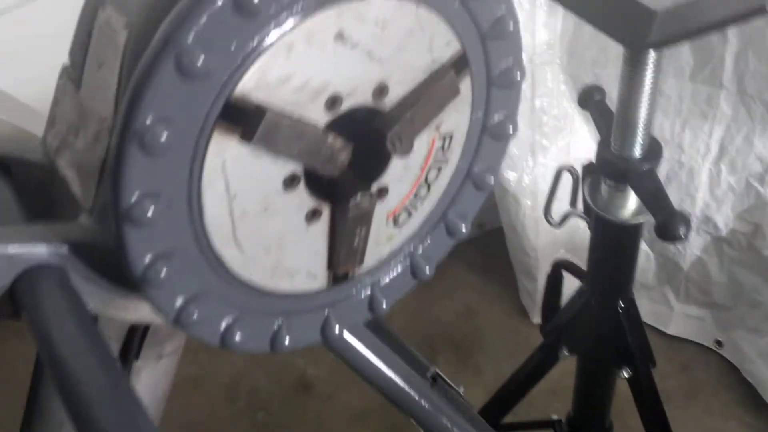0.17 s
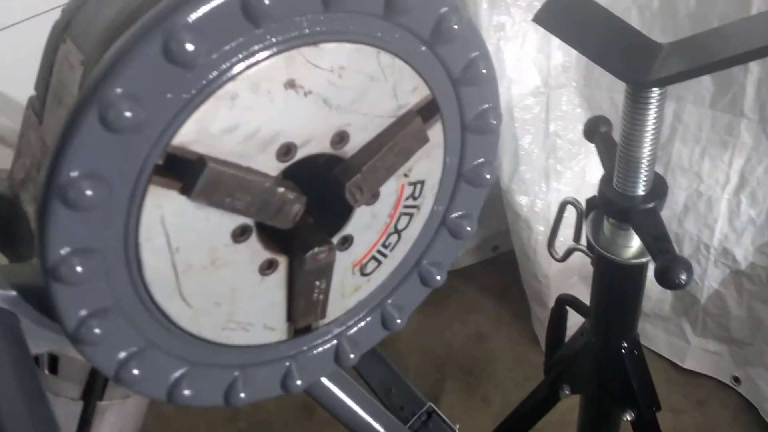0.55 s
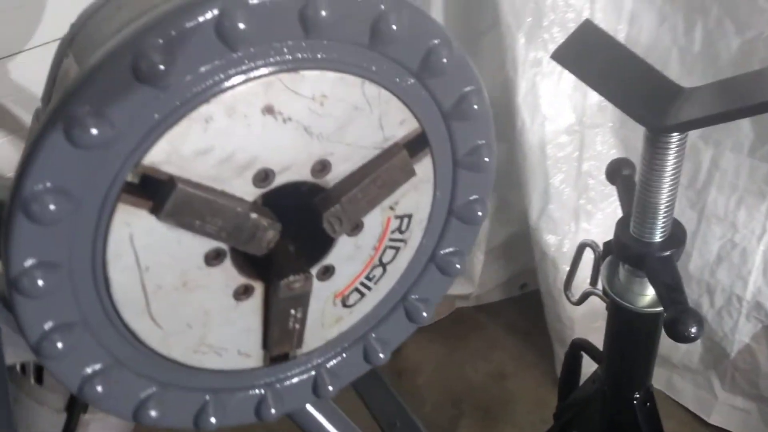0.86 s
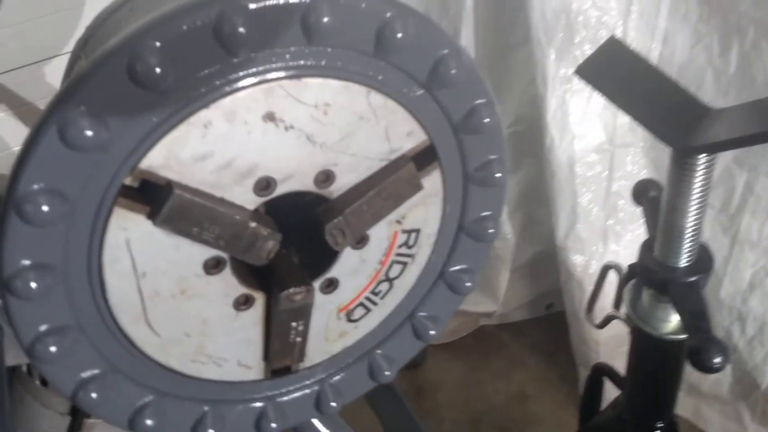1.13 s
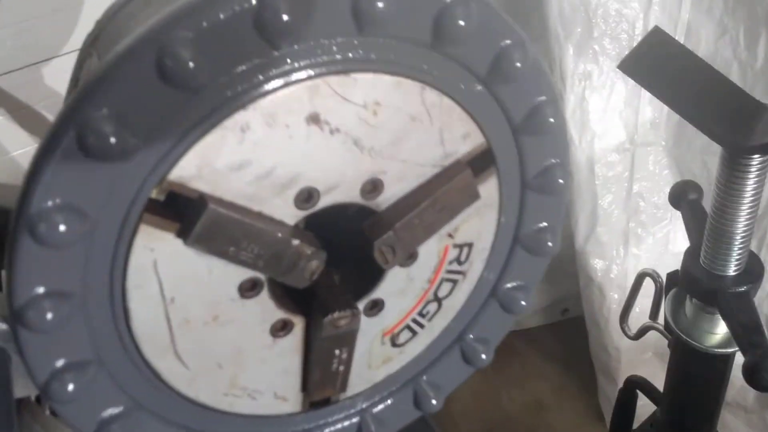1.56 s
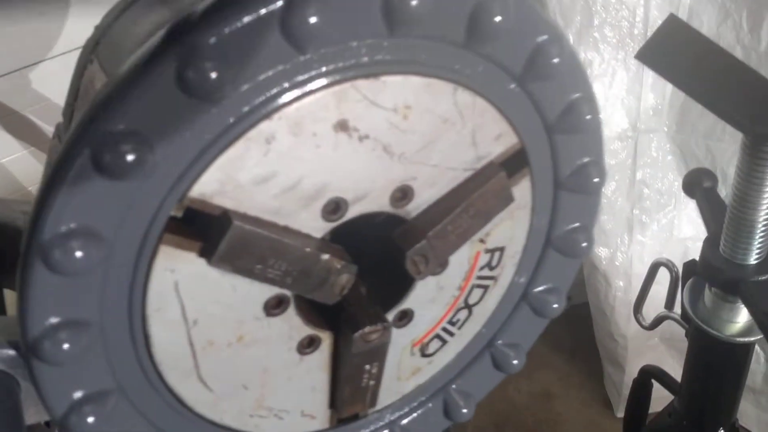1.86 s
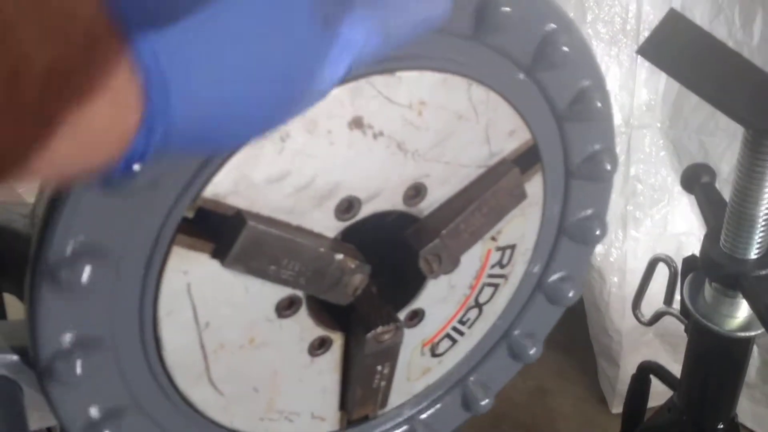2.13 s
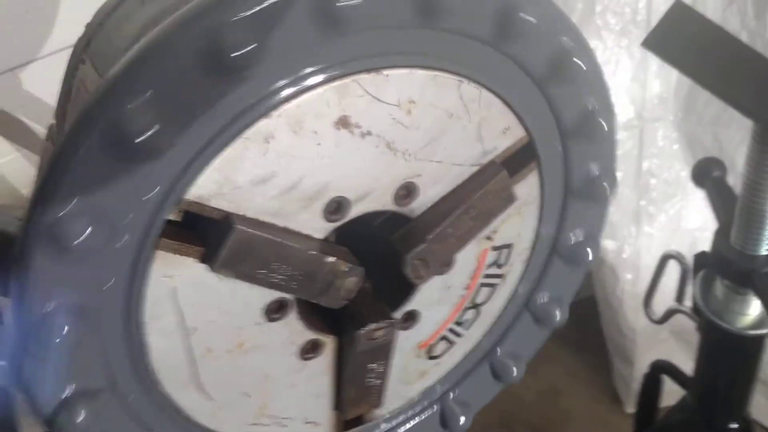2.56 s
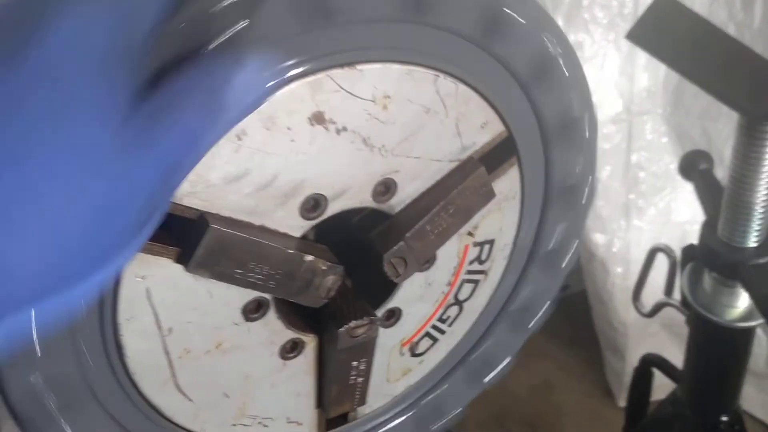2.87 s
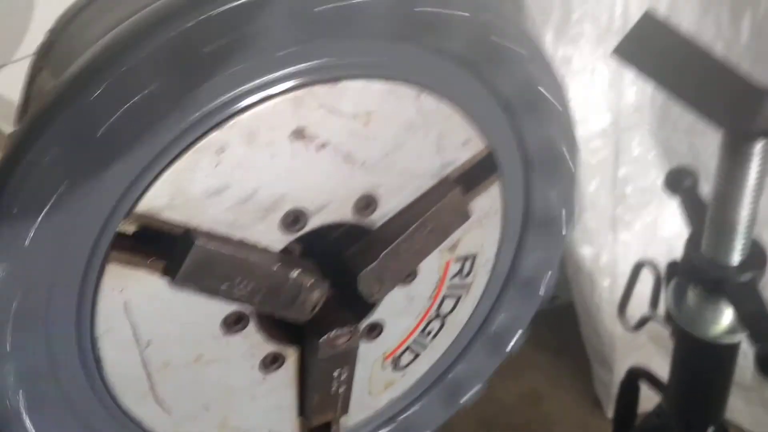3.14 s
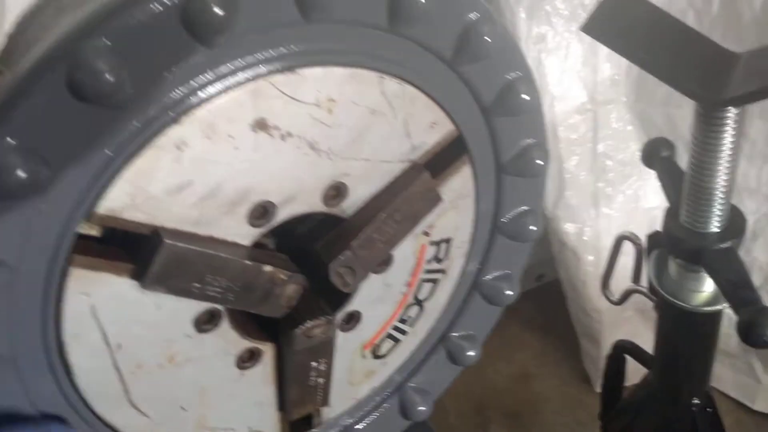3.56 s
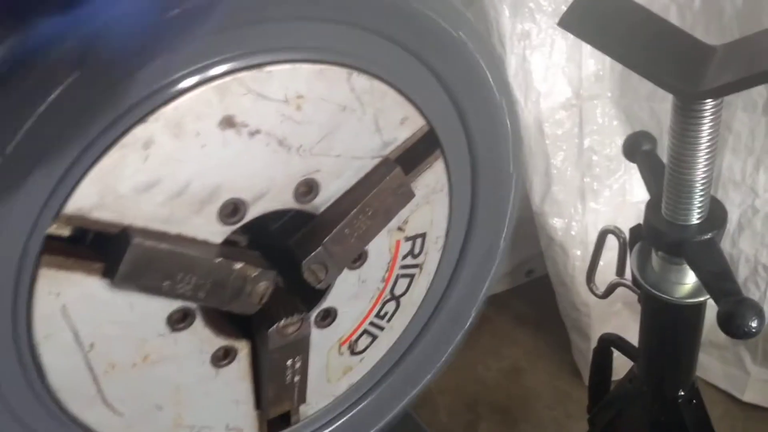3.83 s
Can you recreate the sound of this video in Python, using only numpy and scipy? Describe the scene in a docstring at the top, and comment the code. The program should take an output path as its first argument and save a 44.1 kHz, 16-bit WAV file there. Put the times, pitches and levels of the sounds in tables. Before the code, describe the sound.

A hard metallic clank of a heavy cast wheel strikes at 3.7 s, bright and cracking, with rapid rebounds, clatter and a short inharmonic ring until the end. Before it, low ventilation rumble, faint rubs and dull knocks near 0.5 and 1.1 s, then firmer hollow knocks and gritty glove rubbing at 2.0, 2.3, 2.7-3.0 and 3.5 s. Indoors, close wide stereo microphone.

```python
"""First a low room rumble and soft rubbing: a gloved hand spins the heavy cast wheel of a pipe threader's chuck.
The wheel knocks softly when grabbed, then hammers home with a ringing clank and quick rebounds.
Rumble, rubbing and clatter are shaped noise; wheel, housing and frame are ringing sines set off by clicks and noise.
Two close microphone ports are widened by feeding each, late and inverted, into the other side."""
import sys
import numpy as np
from scipy import signal
from scipy.fft import rfft, irfft
from scipy.io import wavfile

SR = 44100
rng = np.random.default_rng(int(sys.argv[2]) if len(sys.argv) > 2 else 0)


def put_to_file(sound):
    """Save the sound as 16-bit audio at rate SR, in the file named by the first command-line argument."""
    columns = np.atleast_2d(sound).T  # one column per channel
    safe = np.clip(columns, -1, 1)
    whole_steps = np.round(safe * 32767)
    wavfile.write(sys.argv[1], SR, whole_steps.astype(np.int16))


N = 176400  # samples, 4 s

# Sounds have two rows: middle (alike in both ports) and side (opposite in the two ports).
# A t60 is the time in seconds for a sound to die away by 60 dB.


def amp(db):
    """Turn dB into a gain."""
    return 10 ** (np.asarray(db, float) / 20)


def coloured(spectrum, source):
    """Filter middle and side by a spectrum each, then scale their summed power to 1."""
    hz, *levels = np.transpose(spectrum)
    log_hz = np.log(np.maximum(np.arange(N // 2 + 1) * SR / N, 1))
    gains = [amp(np.interp(log_hz, np.log(hz), db)) for db in levels]
    out = irfft(rfft(source) * gains, N)
    return out / np.sqrt(np.mean(out ** 2) * 2)


def noise():
    """Two unrelated white noises."""
    return rng.standard_normal((2, N))


def drift(rate):
    """Slow random wandering with a spread near 1: straight lines between random points, rate per second."""
    knots = rng.standard_normal(int(rate * N / SR) + 2)
    return np.interp(np.arange(N) * rate / SR, np.arange(len(knots)), knots) * np.sqrt(1.5)


def ring(force, hz, t60):
    """A two-pole resonator: a unit click sets a dying sine of starting height 1 ringing."""
    r, w = amp(-60 / (t60 * SR)), 2 * np.pi * hz / SR
    # the tiny offset keeps the silence from slowing the filter
    return signal.lfilter([0, np.sin(w)], [1, -2 * r * np.cos(w), r * r], force + 1e-18)


def dying(times, db, t60, attack_s):
    """Loudness curve of hits: a short rise over an exponential fall."""
    t = np.maximum(np.arange(N) / SR - np.c_[times], 0)
    fall = amp(np.c_[db] - 60 * t / np.c_[t60])
    return (fall * np.minimum(t / attack_s, 1)).sum(axis=0)


def clicks(times, gains):
    """One-sample clicks at the given times."""
    out = np.zeros(N)
    out[(np.array(times) * SR).astype(int)] = gains
    return out


# Tone colour of the room rumble.
# Each row: frequency in Hz, middle level in dB, side level in dB (relative).
ROOM_COLOUR = [(45, -94, -105), (74, -93, -101), (128, -87, -100), (222, -91, -101), (337, -91, -99),
               (653, -94.5, -97.5), (1300, -99, -101.5), (1940, -99, -93.5), (2590, -105, -106),
               (3590, -115, -114), (5830, -122, -121), (8500, -125, -125), (9200, -129, -128),
               (13800, -135, -134)]
# How the room swells. Each row: time in seconds, gain in dB.
ROOM_LOUDNESS = [(0, 2), (.6, 1.5), (1.2, 1), (2.2, 1.5), (3.2, 0), (4, 6.5)]
# Notes of the room. Each row: frequency in Hz, width in Hz, level in dB before the swell.
ROOM_NOTES = [(139.7, 5.2, -69), (359.4, 3.9, -70.5), (269.8, 12, -73), (543, 24, -73), (735.6, 9.9, -73.5),
              (902, 37, -77.5), (1189, 39, -78.5)]
ROOM_DB, ROOM_FLICKER_DB = -60, .6


def room_tone():
    """Distant ventilation rumble: flickering shaped noise, plus noise ringing a few room resonances."""
    out = amp(ROOM_DB + ROOM_FLICKER_DB * drift(14)) * coloured(ROOM_COLOUR, noise())
    for hz, width_hz, db in ROOM_NOTES:
        t60 = np.log(1000) / np.pi / width_hz  # a narrow resonance rings longer
        hum = ring(rng.standard_normal(N), hz, t60)
        out[0] += amp(db) * hum / hum.std()
    return out * amp(np.interp(np.arange(N) / SR, *np.transpose(ROOM_LOUDNESS)))


# Tone colours of the low grind and of the bright hiss; knocks and clank use the hiss too.
# Each row: frequency in Hz, middle level in dB, side level in dB (relative).
GRIND_COLOUR = [(100, -74, -79.5), (306, -72.5, -83), (606, -73, -77.5), (1010, -80, -90),
                (1780, -80.5, -75), (2730, -87, -87), (4100, -107, -108), (6000, -110, -109),
                (8000, -109, -110), (9900, -113, -113), (12500, -121, -121)]
HISS_COLOUR = [(2500, -6, -5), (4700, -0.5, -1.5), (6450, -5.5, -4), (8600, 1.5, -4), (9300, -10, -10),
               (12100, -9, -9), (14700, -19, -19)]
# Rubbing and rustling strokes.
# Each row: start in seconds, length in seconds, grind level in dB, hiss level in dB.
RUB_STROKES = [(0.187, 0.23, -91, -77.5), (0.478, 0.046, -53.5, -70.5), (0.97, .04, -68, -78.5),
               (1.115, 0.057, -61, -68.5), (1.977, 0.016, -51, -84), (2.329, 0.036, -47.5, -60),
               (2.37, 0.035, -51.5, -75), (2.73, 0.059, -50.5, -69.5), (2.876, 0.08, -53, -74.5),
               (2.913, 0.065, -64.5, -73.5), (2.961, 0.02, -52.5, -60.5), (2.981, 0.041, -52.5, -72),
               (3.538, 0.037, -48.5, -87), (3.576, 0.012, -61, -89)]
RUB_ATTACK_S, RUB_RELEASE_S = 0.0084, 0.013
HISS_SWELL_S = 0.033  # the hiss swells and fades more gently than the grind
GRAINS_PER_S, GRAIN_SPREAD_DB = 5000, 3


def rubs():
    """Glove and rim rub: dense uneven grains make the low grind, smooth noise the bright hiss."""
    s, length, grind_db, hiss_db = np.transpose(RUB_STROKES)[:, :, None]
    t = np.arange(N) / SR - s
    left = length - t
    stroke = np.clip(np.minimum(t / RUB_ATTACK_S, 1 + left / RUB_RELEASE_S), 0, 1)
    ramp = np.minimum(.5 + t / HISS_SWELL_S, .5 + left / HISS_SWELL_S)
    swell = np.sin(np.pi / 2 * np.clip(ramp, 0, 1)) ** 2
    grain_db = GRAIN_SPREAD_DB * np.minimum(rng.exponential(1, N), 4)
    grains = (rng.random(N) < GRAINS_PER_S / SR) * amp(grain_db)
    grind = (stroke * amp(grind_db)).sum(axis=0) * coloured(GRIND_COLOUR, grains * noise())
    hiss = (swell * amp(hiss_db)).sum(axis=0) * coloured(HISS_COLOUR, noise())
    return grind + hiss


# Pitches of the cast wheel's modes (its ways of ringing). Each entry: frequency in Hz.
MODE_HZ = [620, 872, 1450, 1590, 1647, 1700, 1771, 1860, 1960, 2401, 2541, 2643, 3315, 3833, 3994, 4228,
           4737, 5424, 5523, 5660, 6955, 7065, 7364, 7580, 7860, 8000, 8376, 8710, 9700, 10015, 10370,
           10541, 10990, 11348, 13280, 13400, 14000]
# Strength of those modes, in the same order.
# Each row: middle level in dB (relative), side level in dB (relative), t60 in seconds when free,
# extra dB when a rebound strikes elsewhere.
MODE_STRENGTHS = [(-21.5, -28, 0.7, -9), (-17.5, -20, 0.27, 10), (-28, -22, 0.4, 0), (-17, -3.5, 0.31, -2),
                  (-7.5, -10, 0.27, 5.5), (-13, -20, 0.36, 11), (-12.5, -3, 0.41, 7.5),
                  (-8.5, -24, 0.17, 2), (-19, -12, 0.31, 8), (-12, -12, 0.28, 22), (-7.5, -13, 0.31, -10),
                  (-18.5, -27, 0.39, -19), (-14, -16, 0.31, -1.5), (-19, -17, 0.2, 8),
                  (-21.5, -17.5, 0.33, 16), (-0.5, -24, 0.11, -20), (-22.5, -35, 0.25, 8),
                  (-12.5, -21, 0.11, 3), (-21.5, -21, 0.35, 11), (-43, -21, 0.23, 18), (-21.5, -32, .27, 7),
                  (-30, -27, 0.18, 6), (-25, -26, 0.34, -2), (-20, -17, 0.29, 0), (-22.5, -23, 0.3, 2),
                  (-26, -18, 0.3, 12), (-20.5, -31, 0.27, 6), (-19, -31, 0.33, 0), (-34, -32, 0.17, -3),
                  (-30, -18, 0.14, -5), (-16.5, -37.5, 0.15, -18), (-22, -27, .25, -4),
                  (-13.5, -30, 0.11, -23), (-25, -18, 0.12, -14), (-29, -29, 0.14, -13),
                  (-46, -40, 0.18, -2), (-43, -42, .2, 0)]


def wheel_modes():
    """Pair each pitch of the casting with its strengths and ring time."""
    return zip(MODE_HZ, MODE_STRENGTHS)


# Tone colour of the thud. Each row: frequency in Hz, middle level in dB, side level in dB (relative).
THUD_COLOUR = [(100, -85, -101), (326, -65, -74), (610, -64, -79), (1110, -80, -84), (1900, -71, -67.5),
               (2400, -79, -78), (3930, -95, -92), (7100, -109, -107), (10100, -124, -120),
               (13000, -131, -134)]
# Modes of the hollow housing. Each row: frequency in Hz, level in dB (relative), t60 in seconds.
HOUSING_MODES = [(345, -35, .06), (563, -3, 0.093), (573, -6.5, 0.14), (894, -17, 0.11), (1190, -8, 0.013)]
# Soft knocks on the wheel. Each row: start in seconds, thud level in dB, thud t60 in seconds, then
# relative levels in dB of the hollow ring, the rim ring, the tick and the pop.
SOFT_KNOCKS = [(0.486, -41.5, 0.02, -62, -55, -77, -47), (1.104, -44, 0.019, -75, -68, -54, -75),
               (1.972, -35.5, 0.032, -57.5, -50, -70, -48), (2.313, -34.5, 0.036, -50, -45, -61, -55),
               (2.319, -35, 0.061, -42, -50, -53, -52), (2.624, -60, 0.033, -66, -62, -74, -53),
               (2.728, -36.5, 0.095, -28, -51, -62, -44), (2.773, -56, .04, -55, -64, -75, -63),
               (2.823, -56, 0.049, -48, -52.5, -70, -54), (2.843, -48, 0.035, -47, -56, -66, -56),
               (2.894, -48, 0.044, -55, -47, -77, -64), (3.518, -32, 0.061, -47, -38, -57, -24),
               (3.535, -35.5, 0.038, -47, -48, -70, -36), (3.68, -27.5, 0.057, -37.5, -38.5, -54, -43)]
KNOCK_ATTACK_S, TICK_T60_S = 0.0023, 0.013
POP_HZ, POP_T60_S = 805, 0.0083  # the contact itself, one short pulse
CONTACT_T60_S = 0.024  # each blow is a burst of contacts
HELD_SHARE, SOFT_HZ = 0.3, 2530  # a hand on the wheel shortens its ring; the glove is a soft contact


def knocks():
    """Soft knocks: noise thud and tick, clicked housing and pop, and a hand-damped rim driven by dull noise."""
    s, thud_db, t60, hollow_db, rim_db, tick_db, pop_db = np.transpose(SOFT_KNOCKS)
    out = dying(s, thud_db, t60, KNOCK_ATTACK_S) * coloured(THUD_COLOUR, noise())
    out += dying(s, tick_db, TICK_T60_S, 0.00081) * coloured(HISS_COLOUR, noise())

    hollow_clicks = clicks(s + KNOCK_ATTACK_S, amp(hollow_db))
    hollow = sum(amp(db) * ring(hollow_clicks, hz, mode_t60) for hz, db, mode_t60 in HOUSING_MODES)
    hollow += ring(clicks(s + KNOCK_ATTACK_S, amp(pop_db)), POP_HZ, POP_T60_S)

    rough = dying(s, rim_db, CONTACT_T60_S, 0.0018) * rng.standard_normal(N)
    force = signal.sosfilt(signal.butter(2, SOFT_HZ, fs=SR, output="sos"), rough)
    for hz, (mid_db, side_db, free_t60, rebound_db) in wheel_modes():
        levels_db = [[mid_db - 19], [side_db - 18.5]] + 0.6 * np.array(rebound_db)
        out += amp(levels_db) * ring(force, hz, HELD_SHARE * free_t60)
    return out + hollow * amp([[0], [-16]])


# Tone colour of the clatter and of the weaker wheel modes.
# Each row: frequency in Hz, middle level in dB, side level in dB (relative).
CLATTER_COLOUR = [(61, -76, -77), (154, -70.5, -90), (294, -75, -78), (600, -68.5, -78.5),
                  (935, -72.5, -70), (1316, -74.5, -78), (1680, -58, -54), (1930, -69.5, -71),
                  (2130, -80, -70), (2450, -66, -64), (2900, -78, -73), (3300, -72, -77),
                  (4130, -76.5, -72.5), (4400, -92, -80), (4620, -78.5, -82), (5700, -77.5, -81),
                  (6370, -100, -90), (7260, -85, -90), (8700, -98, -97), (9300, -110, -108),
                  (10500, -103, -105), (11400, -108, -110), (12400, -130, -128), (13700, -122, -125)]
# The hammer blow and its rebounds. Each row: start in seconds, ring level in dB (relative),
# clatter level in dB, crack level in dB, how far from the first spot it strikes from 0 to 1.
HAMMER_BLOWS = [(3.702, -19.5, -26, -12.5, 0), (3.712, -34.5, -39, -20.5, 0.2), (3.724, -36, -44, -32, .2),
                (3.733, -40.5, -48, -38, 0.2), (3.757, -32.5, -39.5, -33, 0.83),
                (3.771, -38.5, -44, -45, 0.6), (3.797, -34, -34, -45, 0.5), (3.873, -51, -53, -42, 0.5)]
CLANK_FROM = int(3.69 * SR)  # sample; the ringing is computed from just before the first blow
REACH_S = .003  # a blow reaches each mode within this time
CHATTER_T60_S, CHATTER_DB = 0.32, -41  # loose parts chatter on; dB against the ring
# the wheel judders against its stop and keeps feeding the modes
SHUDDER_S, SHUDDER_FADE_S, SHUDDER_DB, SHUDDER_SPOT = 0.1084, 0.019, -59.5, 0.62
# a round casting has its modes in close pairs that beat: largest split as a share of pitch
TWIN_SPLIT, TWIN_DB = .006, -3.5
LEFT_FACING_HZ = 3000  # lower modes radiate towards the left port, higher ones either way
MINOR_MODES, MINOR_LOW_HZ, MINOR_HIGH_HZ = 140, 503.8, 14220
MINOR_T60_S, MINOR_DB, MINOR_SCATTER_DB = 0.17, -42, 2


def wheel():
    """Blows strike paired strong modes; judder and chatter roughen them; contacts drive many weaker modes."""
    s, ring_db, _, _, spot = np.transpose(HAMMER_BLOWS)
    t = np.arange(CLANK_FROM, N) / SR - s[0]
    shudder = amp(SHUDDER_DB) * np.clip(np.minimum(t, SHUDDER_S - t) / SHUDDER_FADE_S, 0, 1)
    chatter = dying(s, ring_db + CHATTER_DB, CHATTER_T60_S, 0.0013)[CLANK_FROM:]
    burst = dying(s, ring_db - 15.5, CONTACT_T60_S, 0.00083)[CLANK_FROM:] + chatter
    strong, minor = np.zeros((2, 2, N))

    for hz, (mid_db, side_db, t60, rebound_db) in wheel_modes():
        facing = [[1], [1 if hz < LEFT_FACING_HZ else rng.choice([-1, 1])]]
        split = TWIN_SPLIT * rng.uniform(-0.98, 1)
        feed = chatter + shudder * amp(SHUDDER_SPOT * rebound_db)
        for pitch, db in ((hz, 0), (hz * (1 + split), TWIN_DB)):
            times = s + REACH_S * rng.random(len(s))
            strikes = facing * clicks(times, amp(ring_db + spot * rebound_db))[CLANK_FROM:]
            force = strikes + feed * rng.standard_normal((2, len(t)))
            strong[:, CLANK_FROM:] += amp([[mid_db + db], [side_db + db]]) * ring(force, pitch, t60)

    even_hz = np.linspace(MINOR_LOW_HZ, MINOR_HIGH_HZ, MINOR_MODES)
    for hz in even_hz + rng.normal(0, 39.3, MINOR_MODES):
        gain = amp(MINOR_SCATTER_DB * rng.standard_normal())
        force = gain * burst * rng.standard_normal((2, len(burst)))
        minor[:, CLANK_FROM:] += ring(force, hz, MINOR_T60_S)
    return strong + amp(MINOR_DB) * coloured(CLATTER_COLOUR, minor)


CLATTER_T60_S, CRACK_T60_S, CRACK_ATTACK_S = 0.42, 0.063, 0.0017
SNAP_DB, SNAP_T60_S = -23, 0.032  # bright edge of the first blow


def clatter():
    """Loose jaws clatter and crack as dying shaped noise at every blow; the first adds a bright snap."""
    s, _, clatter_db, crack_db, _ = np.transpose(HAMMER_BLOWS)
    level = dying(s, clatter_db, CLATTER_T60_S, 0.0054)
    level += dying(s, crack_db, CRACK_T60_S, CRACK_ATTACK_S)
    snap = dying(s[:1], [SNAP_DB], SNAP_T60_S, CRACK_ATTACK_S)
    return level * coloured(CLATTER_COLOUR, noise()) + snap * coloured(HISS_COLOUR, noise())


# Jolt of the frame at the first blow.
# Each row: frequency in Hz, middle level in dB (relative), side level in dB (relative), t60 in seconds.
FRAME_MODES = [(138, -10.5, -5, 0.043), (78, -27, -14, 0.097), (254, -20.5, -19, 0.047),
               (427, -19.5, -22, 0.064), (871, -16, -21, 0.055), (3263, -17.5, -22, .05),
               (1720, -37, -6.5, 0.022)]
JOLT_LAG_S = 0.001013  # the frame answers late


def jolt():
    """One click, just after the first blow, sets the modes of the frame ringing briefly."""
    first_s = np.transpose(HAMMER_BLOWS)[0][:1]
    click = clicks(first_s + JOLT_LAG_S, 0.76)
    return sum(amp([[mid_db], [side_db]]) * ring(click, hz, t60) for hz, mid_db, side_db, t60 in FRAME_MODES)


PORT_TILT_DB = .5  # left port above, right below


def scene():
    """Add all layers and turn middle and side into left and right port."""
    mid, side = room_tone() + rubs() + knocks() + wheel() + clatter() + jolt()
    return np.array([mid + side, mid - side]) * amp([[PORT_TILT_DB], [-PORT_TILT_DB]])


CROSSFEED, CROSS_LAG_S = 0.47, 0.0004735
RUMBLE_CUT_HZ, CUTOFF_HZ = 77, 15900
LIMIT_DB, LIMIT_RELEASE_DB_PER_S, LIMIT_ATTACK_S, LOOK_AHEAD_S = -2.5, 100, .0004, .001


def record(dry):
    """Inverted late crossfeed, bass cut, peak limiter, steep top cut."""
    # turning the phase of each frequency delays by a fraction of a sample; padding catches the overhang
    padded = N + 128
    hz = np.arange(padded // 2 + 1) * SR / padded
    late = irfft(rfft(dry[::-1], padded) * np.exp(-2j * np.pi * hz * CROSS_LAG_S))[:, :N]
    bass_cut = signal.butter(2, RUMBLE_CUT_HZ, "high", fs=SR, output="sos")
    wide = signal.sosfilt(bass_cut, dry - CROSSFEED * late)

    # hold each overshoot, let it fall steadily, and turn down both ports together
    fall = LIMIT_RELEASE_DB_PER_S * np.arange(N) / SR
    peak_db = 20 * np.log10(np.abs(wide).max(axis=0) + 1e-9)
    over = np.maximum(peak_db - LIMIT_DB, 0)
    held = np.maximum.accumulate(over + fall) - fall
    early = np.roll(held, -int(LOOK_AHEAD_S * SR))
    r = np.exp(-1 / (LIMIT_ATTACK_S * SR))
    limited = wide * amp(-signal.lfilter([1 - r], [1, -r], early))
    return signal.sosfilt(signal.cheby2(12, 60, CUTOFF_HZ, fs=SR, output="sos"), limited)


dry = scene()
out = record(dry)
put_to_file(out)
```